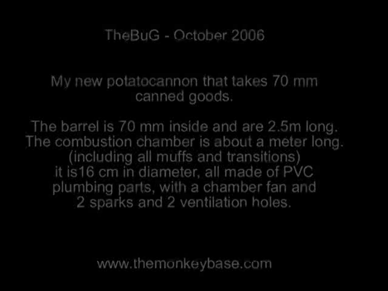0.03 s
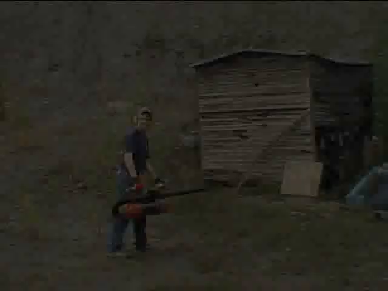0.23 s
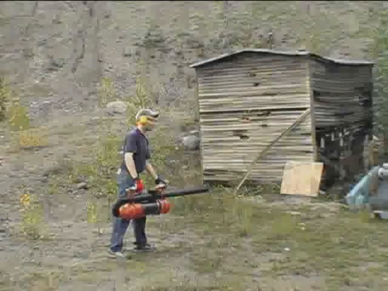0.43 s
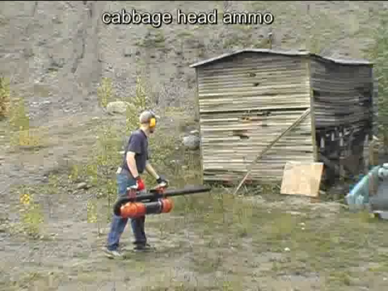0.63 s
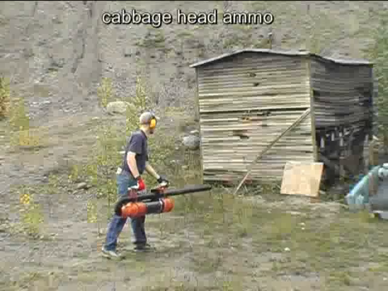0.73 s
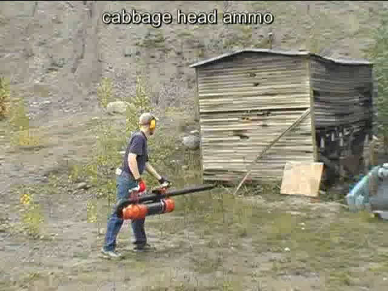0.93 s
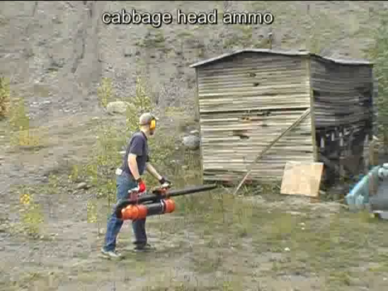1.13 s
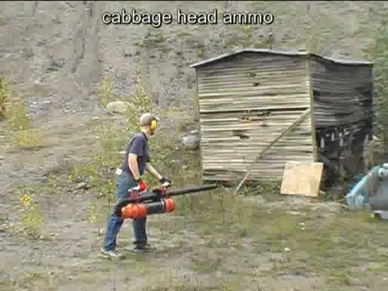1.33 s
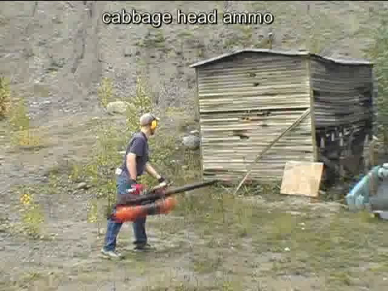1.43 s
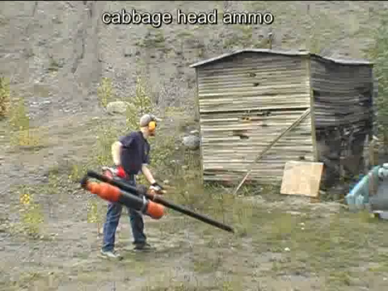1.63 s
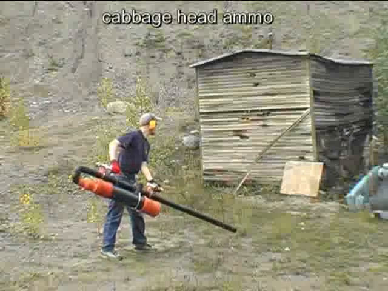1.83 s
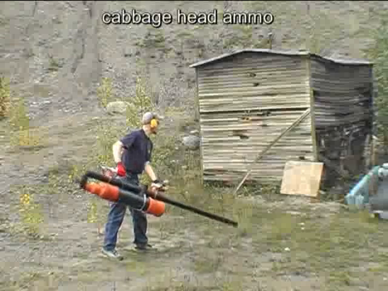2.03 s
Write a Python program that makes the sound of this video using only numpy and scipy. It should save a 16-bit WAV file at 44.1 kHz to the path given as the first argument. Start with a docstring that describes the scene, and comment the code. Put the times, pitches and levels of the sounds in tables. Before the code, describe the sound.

Near silence with a faint whine, gritty shoe scuffs and an igniter click, then a sudden hollow cannon bang that distorts the mono microphone, booming slapbacks and a long rushing gravel-pit echo.

```python
"""Potato cannon in a gravel pit

Shoes scuff, the grip and igniter click, and thin high chirps sound over a soft hiss and a faint whine. Then a
rushing noise builds in the barrel and the blast bursts out in surges: shaped noise with a few barrel
resonances. The shed and near banks slap it back as noise cracks and booming tones; the stony slopes scatter it
into thousands of tiny clicks, a long rushing echo that grows duller and loses its bass. The loud blast
overloads the microphone, which squashes the peaks."""
import sys
import numpy as np
from scipy import signal
from scipy.fft import rfft, irfft, next_fast_len
from scipy.io import wavfile

SR = 44100
rng = np.random.default_rng(int(sys.argv[2]) if len(sys.argv) > 2 else 0)


def file_out(sig):
    """Save sig as 16-bit WAV at sys.argv[1]."""
    # one column per channel
    cols = np.atleast_2d(sig).T
    # limit, then scale
    lim = np.clip(cols, -1, 1)
    pcm = np.round(lim * 32767).astype(np.int16)
    wavfile.write(sys.argv[1], SR, pcm)


N = 91287  # length in samples
T = np.arange(N) / SR  # time in seconds

# Surges of gas at the muzzle; the first one also starts the echo.
# Each row: start in seconds, level in dB before colouring, rise in seconds, decay in seconds.
SURGES = [(1.3159, -5.5, 0.0044, 0.0098), (1.325, -14, 0.0025, .008), (1.3417, -4.5, 0.0015, 0.0064)]


def undb(db):
    """Turn decibels into a gain."""
    return 10 ** (np.asarray(db) / 20)


def colour(x, points):
    """Filter through (Hz, dB) points without ringing ahead of time; white noise keeps its power."""
    hz, db = np.array(points).T
    size = 2 * next_fast_len(N)
    freqs = np.fft.rfftfreq(size, 1 / SR)
    gain = undb(np.interp(np.log(freqs + 1), np.log(hz), db))
    gain = gain / np.sqrt(np.mean(gain ** 2))
    # Folding the cepstrum forward gives the filter that reacts as early as possible.
    cepstrum = irfft(np.log(gain))
    cepstrum[1:size // 2] *= 2
    cepstrum[size // 2 + 1:] = 0
    response = np.exp(rfft(cepstrum))
    return irfft(rfft(x, size) * response)[:N]


def noise():
    """White noise, rms 1."""
    return rng.standard_normal(N)


def grains(rate, scatter_db):
    """Dense random clicks of uneven size and either sign, rms 1; rate is clicks per second."""
    hits = rng.random(N) < rate / SR
    x = hits * np.sign(noise()) * undb(scatter_db * noise())
    return x / np.std(x)


def burst(start, rise, decay):
    """Envelope with a straight rise and an exponential fall, all in seconds."""
    attack = np.clip((T - start) / rise, 0, 1)
    return attack * np.exp(-np.maximum(T - start - rise, 0) / decay)


def swell(centre, width):
    """Bell-shaped envelope; width is the standard deviation in seconds."""
    return np.exp(-.5 * ((T - centre) / width) ** 2)


def ring(x, hz, width):
    """One resonance with gain 1 at its centre; width in Hz."""
    return signal.lfilter(*signal.iirpeak(hz, hz / width, fs=SR), x)


def shot():
    """A rushing noise builds up in the barrel, bursts out in surges and trails off as a hissing jet."""
    # A rushing noise building up to the blast. Each row: time in seconds, level in dB.
    rush_level = [(1.26, -107), (1.264, -55.5), (1.283, -57), (1.299, -31), (1.301, -26.5), (1.314, -21.5),
                  (1.322, -16), (1.335, -75)]
    # Tone of the rush. Each row: frequency in Hz, relative level in dB.
    rush_colour = [(60, -26), (300, -13.5), (710, -24), (1100, -2), (1700, -2), (2200, -3), (5800, -7.5),
                   (15000, -21)]
    # Tone of the blast. Each row: frequency in Hz, relative level in dB.
    blast_colour = [(40, -26), (150, -20), (300, -5), (520, 0), (740, -16), (830, -17), (980, -1.5),
                    (1200, -1), (1650, 1), (2200, -11.5), (2850, -3), (3700, -6.5), (6000, -13),
                    (15000, -21.5)]
    # Barrel resonances that colour the blast. Each row: frequency in Hz, width in Hz, level in dB.
    blast_peaks = [(260, 54, -2), (522, 35, -7), (937, 110, -2), (1640, 76, -10)]
    # Tone of the escaping jet. Each row: frequency in Hz, relative level in dB.
    jet_colour = [(500, -23), (3000, 4), (6000, 1.5), (12000, -3), (15500, -10)]
    puff_s, puff_width_s = 1.345, 0.0016

    rush_gain = undb(np.interp(T, *np.array(rush_level).T, left=-200, right=-200))
    rush = rush_gain * colour(noise(), rush_colour)

    force = sum(undb(db) * burst(s, rise, decay) for s, db, rise, decay in SURGES)
    blast = colour(force * noise(), blast_colour)
    blast = blast + sum(undb(db) * ring(blast, hz, width) for hz, width, db in blast_peaks)

    jet = undb(-10.5) * burst(1.326, rise=0.008, decay=0.024) * colour(noise(), jet_colour)

    # A slow push and pull of pressure under the strongest surge.
    push_pull = (puff_s - T) / puff_width_s * swell(puff_s, puff_width_s)
    puff = undb(-23.5) * push_pull
    return rush + blast + jet + puff


def slaps():
    """The shed and near banks each return a crack of noise and the pipe's low boom as fading tones."""
    # Slaps. Each row: start in seconds, crack level in dB before colouring, crack decay in seconds,
    # thump level in dB, which sets how strongly the boom sounds.
    walls = [(1.3626, -11.5, 0.015, -20), (1.3762, -6.5, 0.0018, -13), (1.422, -17, 0.012, -26),
             (1.4376, -28, 0.011, -15.5), (1.449, -25, 0.015, -26), (1.457, -40, 0.0083, -16.5)]
    # Tone of the cracks. Each row: frequency in Hz, relative level in dB.
    slap_colour = [(50, -27), (110, -14), (200, 6), (400, 4), (800, -6), (1300, 3.5), (1700, 3), (2300, -5),
                   (4000, -7), (8000, -10), (15000, -22)]
    # The pipe's boom. Each row: pitch in Hz, level in dB relative to the other tones,
    # time to fade by 60 dB in seconds.
    boom_tones = [(98, -9.5, 0.26), (173, -6, 0.12), (204.7, -7, 0.28), (266, -8, 0.17), (353, -4, 0.037),
                  (503, 0.5, 0.019)]

    crack_level = sum(undb(db) * burst(s, rise=0.00032, decay=decay) for s, db, decay, _ in walls)
    crack = colour(crack_level * noise(), slap_colour)

    boom = 0
    for s, _, _, thump_db in walls:
        for hz, db, t60 in boom_tones:
            fade = burst(s, rise=.0007, decay=t60 / np.log(1000))
            tone = np.sin(2 * np.pi * hz * (T - s)) / 2
            boom = boom + undb(thump_db + db) * fade * tone
    low_cut = signal.butter(N=2, Wn=137, btype="high", fs=SR)
    return crack + signal.lfilter(*low_cut, boom)


def slopes():
    """Stones and trees return thousands of small echoes; later ones have less treble and bass left."""
    # Swells of echo. Each row: centre in seconds, level in dB at 2 kHz before the losses,
    # width in seconds, tilt in dB per octave.
    echo_swells = [(1.401, -21, .06, -0.7), (1.522, -20, 0.059, 0), (1.603, -16, 0.037, 1),
                   (1.677, -17, 0.055, 1), (1.779, -16, 0.071, 0.5), (1.91, -18.5, 0.11, -0.43),
                   (2.03, -18.5, 0.075, -0.5)]
    # Tone of the echo before the losses. Each row: frequency in Hz, relative level in dB.
    echo_colour = [(30, -64), (60, -36), (95, -4), (135, -5.5), (175, 5.5), (240, 1.5), (380, -1),
                   (560, -2.5), (740, -2.5), (1100, -3.5), (1500, -4.5), (2100, -4), (2900, -3.5),
                   (4300, -6.5), (6500, -7.5), (10000, -12.5), (15000, -15)]
    # Pitches that stand out for a while. Each row: centre in seconds, width in seconds,
    # pitch in Hz, bandwidth in Hz, level in dB relative to the echo at that pitch.
    echo_peaks = [(1.6, 0.28, 269, 18, 0.5), (1.6, 0.3, 347, 19, -0.5), (1.75, 0.049, 725, 50, 5.5),
                  (1.82, 0.048, 1037, 44, 4.5), (1.72, 0.3, 1437, 45, -7), (1.72, .12, 1610, 47, -6),
                  (1.9, 0.22, 2810, 59, -3.5)]
    air_db_per_s, air_power = 37, 1.81  # treble loss at 10 kHz, and how steeply it grows with pitch
    bass_db_per_s, bass_hz = 28, 340  # loss at the very bottom, and the pitch where it has halved

    echoes = colour(grains(rate=5000, scatter_db=0.5), echo_colour)
    peaks = sum(undb(db) * swell(s, width) * ring(echoes, hz, band)
                for s, width, hz, band, db in echo_peaks)
    spectrum = rfft(echoes + peaks)
    freqs = np.fft.rfftfreq(N, 1 / SR)
    centres = np.geomspace(60, 16000, 18)
    age = np.maximum(T - SURGES[0][0], 0)  # seconds since the first surge

    # Split the echo into overlapping bands so that each can swell and fade in its own way.
    out = 0
    for hz, share in zip(centres, np.eye(len(centres))):
        band = irfft(spectrum * np.interp(freqs, centres, share), N)
        octaves = np.log2(hz / 2000)
        power = sum((undb(db + tilt * octaves) * swell(s, width)) ** 2
                    for s, db, width, tilt in echo_swells)
        air_loss = air_db_per_s * (hz / 10 ** 4) ** air_power
        bass_loss = bass_db_per_s / (1 + (hz / bass_hz) ** 2)
        out = out + band * np.sqrt(power) * undb(-age * (air_loss + bass_loss))
    return out * np.clip(age / 0.078, 0, 1)  # the echo opens up gradually


def handling():
    """Shoes grind sand grains into gritty scuffs; grip and igniter click as tiny bursts of noise."""
    # Scuffs on sandy ground. Each row: centre in seconds, level in dB, width in seconds.
    scuffs = [(.458, -61.5, 0.044), (0.499, -61.5, 0.029), (.589, -51, 0.013), (0.603, -53.5, .006),
              (0.633, -58, .012), (.68, -63.5, 0.024)]
    # Tone of the scuffs. Each row: frequency in Hz, relative level in dB.
    scuff_colour = [(60, -25), (380, 0.5), (1000, -4.5), (1500, -1), (2900, 1), (4500, -7), (6000, -8.5),
                    (8500, -16.5), (12500, -16), (15000, -40)]
    # Grip and igniter. Each row: start in seconds, level in dB before colouring, decay in seconds.
    clicks = [(.409, -42, 0.00082), (1.0998, -42.5, 0.0011), (1.1067, -49, 0.0045)]
    # Tone of the clicks. Each row: frequency in Hz, relative level in dB.
    click_colour = [(200, -11), (700, -15), (1100, 5.5), (1600, -9), (2400, 4), (3800, -7.5), (5500, -22),
                    (13000, -26)]

    scuff_level = sum(undb(db) * swell(s, width) for s, db, width in scuffs)
    click_level = sum(undb(db) * burst(s, rise=0.00011, decay=decay) for s, db, decay in clicks)
    grit = colour(scuff_level * grains(rate=5000, scatter_db=2.5), scuff_colour)
    return grit + colour(click_level * noise(), click_colour)


def chirps():
    """Faint, slightly rough whistles, likely distant birds: noise narrowed twice around one pitch."""
    # Each row: centre in seconds, width in seconds, pitch in Hz, level in dB.
    calls = [(.173, 0.0083, 3300, -66), (.228, .02, 3000, -70), (.439, .004, 5430, -62),
             (.445, 0.0046, 4730, -61), (.458, 0.0075, 4820, -61.5)]
    band_hz = 250
    out = 0
    for s, width, hz, db in calls:
        tone = ring(ring(noise(), hz, band_hz), hz, band_hz)
        out = out + undb(db) * swell(s, width) * tone / np.std(tone)
    return out


def background():
    """A soft steady hiss of noise, and a faint steady whine of sines, likely the camera's own."""
    # Tone of the hiss. Each row: frequency in Hz, relative level in dB.
    hiss_colour = [(18, -50), (30, -17), (182, -8.5), (274, -7), (303, -5), (503, -3.5), (543, -11),
                   (737, -5.5), (1190, -9.5), (2200, -9.5), (4140, -16), (10900, -23), (13000, -26.5)]
    # Whine. Each row: pitch in Hz, rms level in dB.
    whine_tones = [(511.4, -77), (748.3, -76.5), (1502, -73), (2099, -84), (2250, -77.5)]

    whine = 0
    for hz, db in whine_tones:
        tone = np.sin(2 * np.pi * (hz * T + rng.random()))  # random starting phase
        whine = whine + undb(db) * np.sqrt(2) * tone
    return undb(-64) * colour(noise(), hiss_colour) + whine


def scene():
    """Everything added up as it reaches the one microphone."""
    return (shot() + slaps() + slopes() + handling() + chirps() + background())[None]


def record(dry):
    """The microphone overloads; a comb of notches colours it; the sound fades in and the top is cut."""
    # Fade-in: its start and its end, both in seconds.
    fade_in = (0.086, 0.37)
    ceiling = 0.62  # loud peaks are squashed towards this size
    notch_hz, notch_feedback, notch_depth = 300, .76, 0.68
    x = ceiling * np.tanh(dry / ceiling)

    # A feedback delay picks out what repeats at the notch spacing; taking it away leaves notches.
    lag = np.zeros(round(SR / notch_hz))
    delayed = np.r_[lag, 1 - notch_feedback]
    feedback = np.r_[1, lag[1:], -notch_feedback]
    periodic = signal.lfilter(delayed, feedback, x)
    # The notches grow shallower towards the treble.
    x = x - notch_depth * signal.filtfilt(*signal.butter(1, 11100, fs=SR), periodic)

    x = x * np.interp(T, fade_in, [0, 1])
    top_cut = signal.ellip(10, .2, 80, 15400, fs=SR, output="sos")  # steep cut above 15.4 kHz
    return signal.sosfilt(top_cut, x)


dry = scene()
out = record(dry)
file_out(out)
```